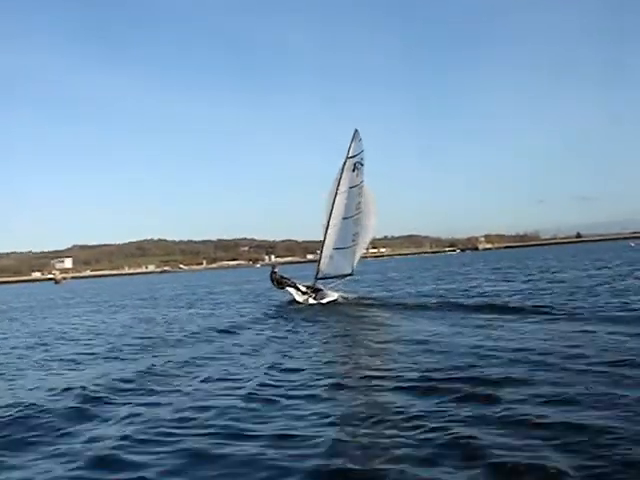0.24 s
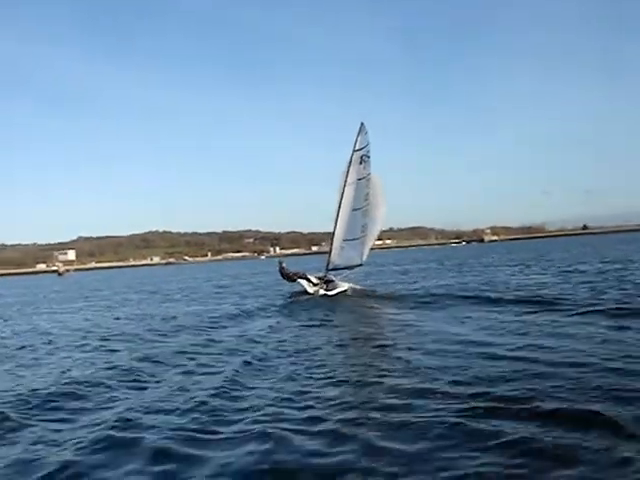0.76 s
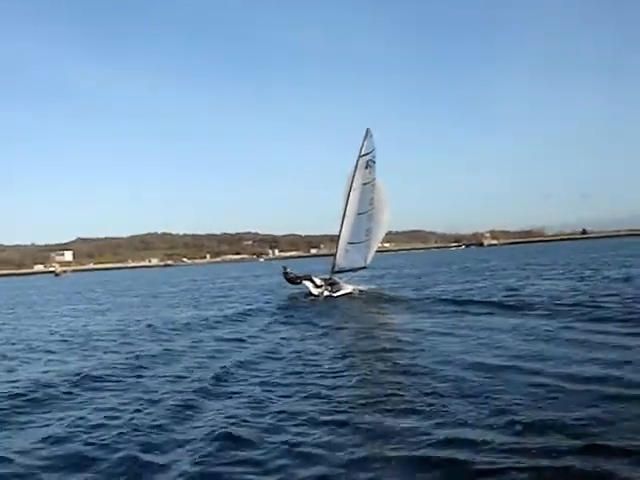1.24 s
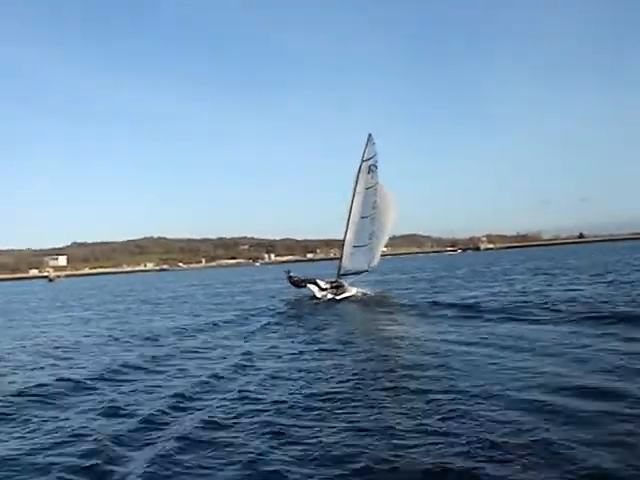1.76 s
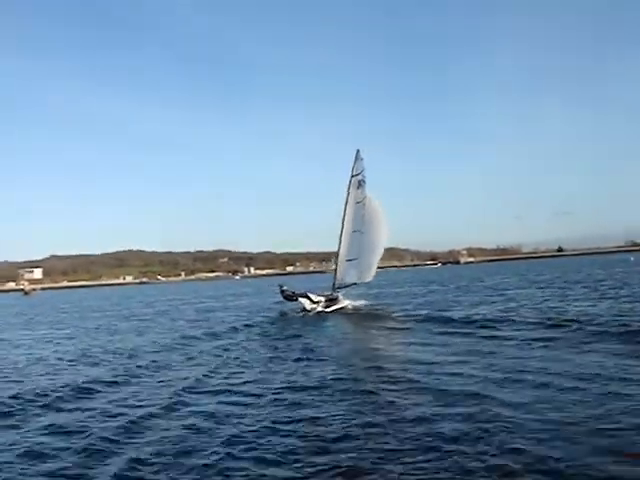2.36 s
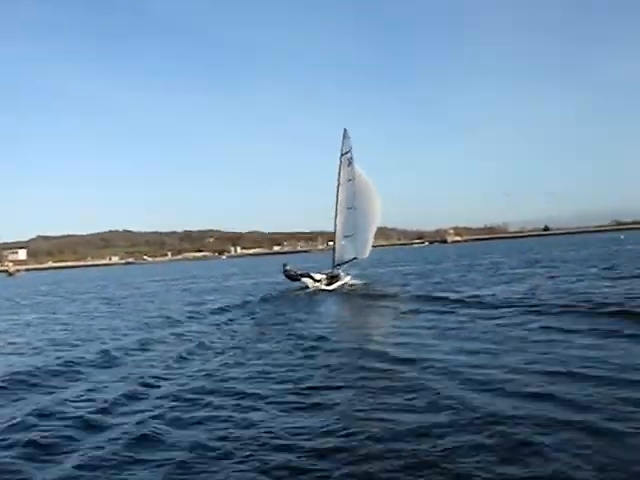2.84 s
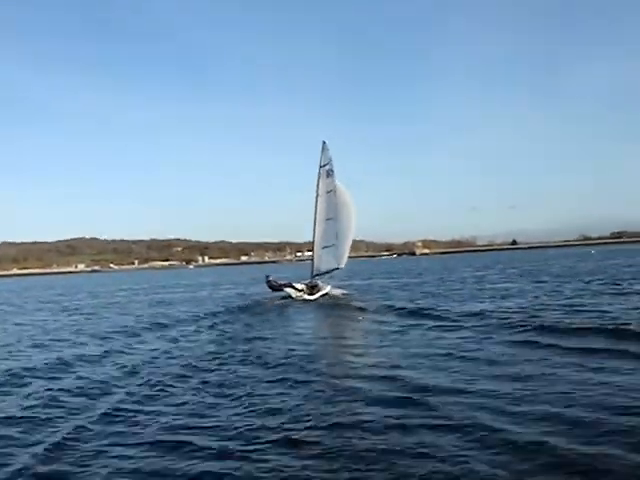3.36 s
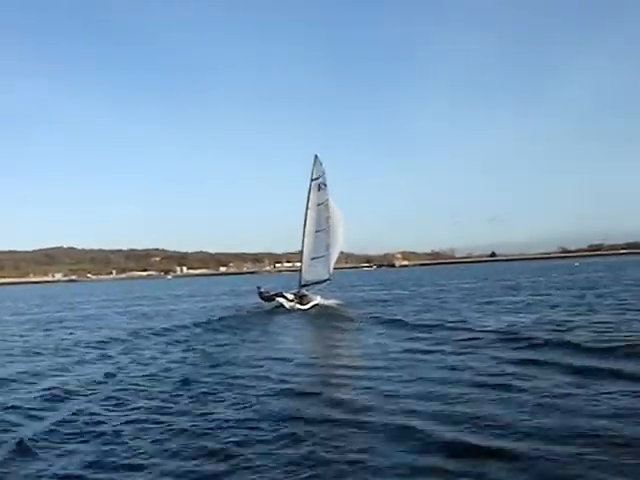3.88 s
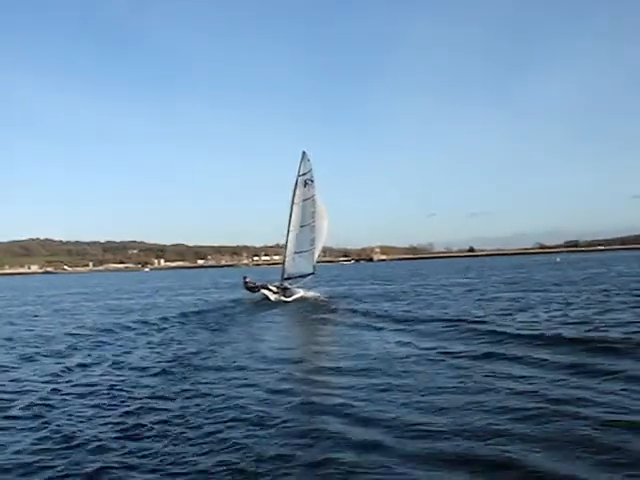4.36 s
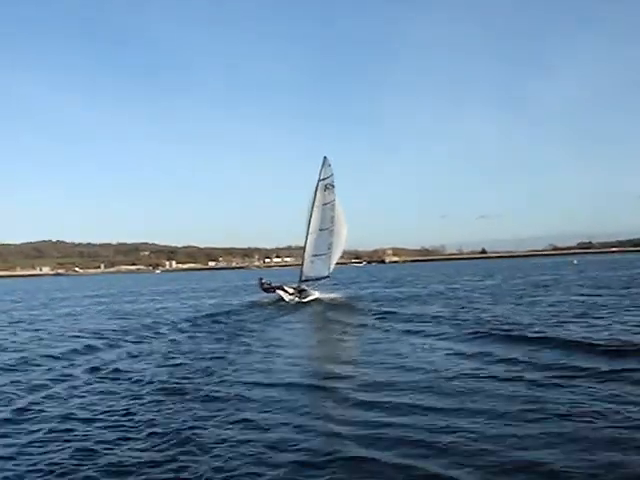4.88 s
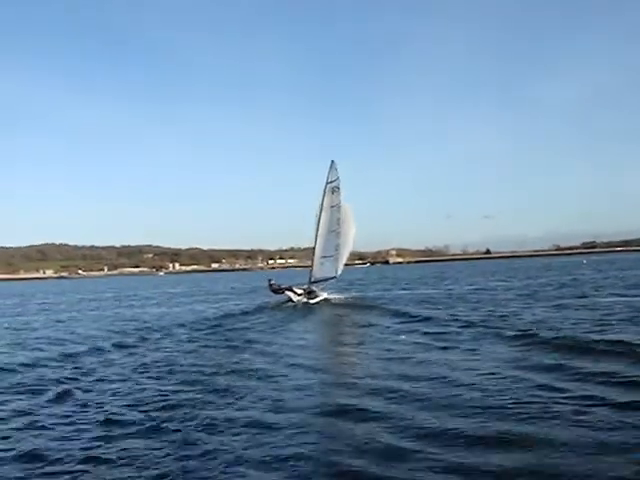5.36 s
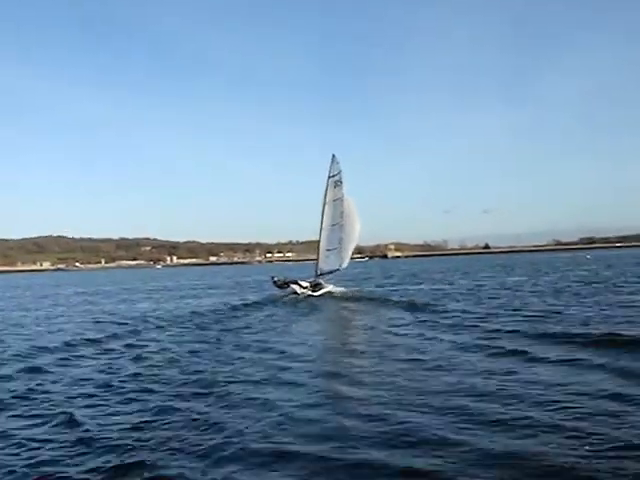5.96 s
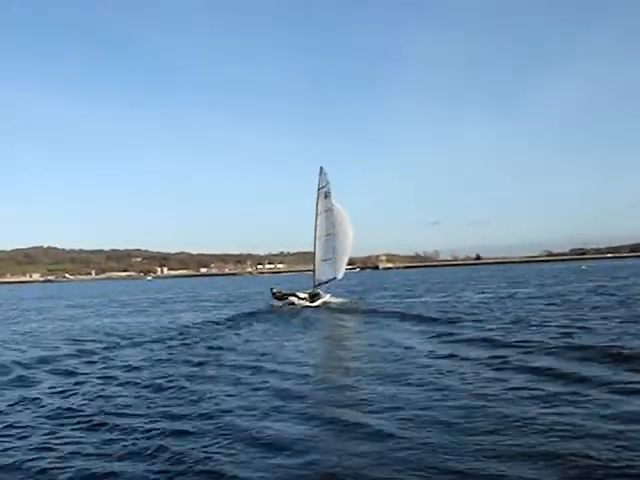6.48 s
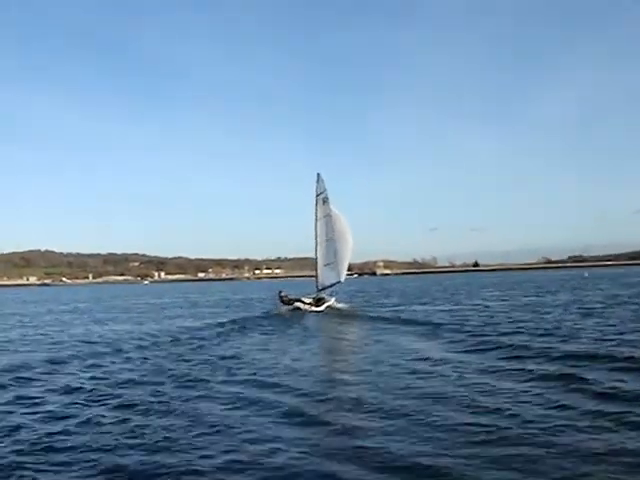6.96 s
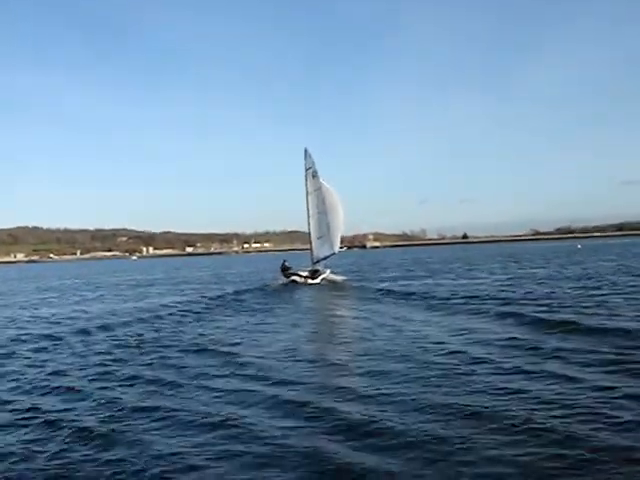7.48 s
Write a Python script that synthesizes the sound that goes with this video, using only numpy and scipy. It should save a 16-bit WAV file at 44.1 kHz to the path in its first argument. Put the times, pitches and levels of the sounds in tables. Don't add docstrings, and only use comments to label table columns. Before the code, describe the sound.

A small boat's outboard motor drones steadily over rushing hull water and hissing spray, while gusty wind buffets and overloads the small microphone.

```python
import sys
import numpy as np
from scipy import signal
from scipy.fft import rfft, irfft, next_fast_len
from scipy.io import wavfile
from scipy.ndimage import uniform_filter1d, minimum_filter1d, map_coordinates

SR = 44100
rng = np.random.default_rng(int(sys.argv[2]) if len(sys.argv) > 2 else 0)


def unload_audio(sound):
    columns = np.transpose(np.atleast_2d(sound))
    steps = np.round(np.clip(columns, -1, 1) * 32767)
    wavfile.write(sys.argv[1], SR, steps.astype(np.int16))


def gain_from_db(level_db):
    decades = np.asarray(level_db, float) / 20
    return 10 ** decades


N = 340452

# time_s, strength_db
WIND_STRENGTH = [(0, 1.5), (.55, -3), (1.0, 0.5), (1.5, 4), (2.1, 1.5), (2.5, 0.5), (3.0, -3.5), (3.5, 0.5),
                 (3.9, 2), (4.53, -4.5), (4.9, 1.5), (5.5, -2.5), (5.85, 1), (6.08, -7), (6.7, -6.5),
                 (7.3, -7.5), (7.72, -3.5)]


def unit(x):
    return x / np.sqrt(np.mean(x ** 2) + 1e-20)


def noise():
    return rng.standard_normal(N)


def curves(rows):
    s, *cols = np.transpose(rows)
    return [np.interp(np.arange(N) / SR, s, c) for c in cols]


def wobble(rate):
    coarse = np.arange(0, N + 32, 32)
    knots = rng.standard_normal(int(N * rate / SR) + 4)
    smooth = map_coordinates(knots, [coarse * rate / SR])
    return np.interp(np.arange(N), coarse, smooth)


def swells(s, db, length_s):
    t = np.arange(0, N / SR + .002, .002)
    distance = (t - s[:, None]) / np.reshape(length_s, (-1, 1))
    humps = np.exp(-4 * distance ** 2)
    return np.interp(np.arange(N) / SR, t, db @ humps)


def coloured(x, spectrum):
    m = next_fast_len(N + 8192)
    f, db = np.transpose(spectrum)
    log_hz = np.log(np.fft.rfftfreq(m, 1 / SR) + 1)
    gain = gain_from_db(np.interp(log_hz, np.log(f), db))
    return unit(irfft(rfft(x, m) * gain, m)[:N])


def patchy(patchy_db):
    z = signal.stft(noise(), nperseg=512)[2]
    field = uniform_filter1d(rng.standard_normal(z.shape), size=8, axis=0)
    field = uniform_filter1d(field, size=10, axis=1)
    return signal.istft(z * gain_from_db(patchy_db * unit(field)), nperseg=512)[1][:N]


def eddy_levels_db():
    # time_s, strength_db, length_s, tightness (-1 slow deep eddies, 1 quick tight ones)
    gust_events = [(.06, 7, .07, -0.47), (.72, 4, 0.13, 0.075), (.87, 5, 0.082, -.3), (1.04, 6, 0.053, .6),
                   (1.17, 5.5, 0.086, .5), (1.31, 3.7, .09, -1.4), (1.45, 3, 0.13, -0.32),
                   (1.57, 2.2, .05, .6), (1.73, 4.6, 0.081, 0.57), (1.97, 5, .14, 0.27),
                   (2.18, 2, 0.065, -.4), (2.48, 4.4, .07, -.9), (3.1, 3.9, .09, 0),
                   (3.3, 4.6, 0.082, -0.48), (3.52, 5.4, .08, -.7), (3.65, 8, 0.053, -.6),
                   (3.81, 7, .1, 0.063), (4.28, 6.8, 0.11, 0), (4.43, 3, .07, -0.44),
                   (4.66, 8.6, 0.088, 0.53), (4.77, 9.1, 0.075, 0.1), (4.95, 3.6, .08, -0.77),
                   (5.12, 4.6, 0.047, -1.1), (5.3, 4.8, .07, 0.62), (5.55, 4, .15, -.8),
                   (5.77, 3.8, 0.1, 0), (6.81, 7.7, 0.093, -0.41), (7.15, 6.8, 0.095, -0.31)]
    s, db, length_s, tight = np.transpose(gust_events)
    strength_db, = curves(WIND_STRENGTH)
    deep_db = .6 * strength_db + swells(s, .8 * db * (1 - tight), length_s)
    middle_db = strength_db + swells(s, db * (1 - tight ** 2 / 2), length_s)
    tight_db = .6 * strength_db + swells(s, 0.77 * db * (1 + tight), length_s)
    return deep_db, middle_db, tight_db


def gust_blows():
    # time_s, peak_db
    blow_events = [
        (1.16, -9),
        (1.567, -2),
        (1.695, -9),
        (1.705, -8),
        (1.7385, -.5),
        (2.008, -11),
        (4.641, -9),
        (4.707, -8),
        (4.756, -9),
    ]
    u = (np.arange(SR // 100) / SR - .003) / .0007
    blow = (u * u - 1) * np.exp(-u * u / 2)
    out = np.zeros(N)
    for s, db in blow_events:
        out[round(s * SR):][:len(u)] += gain_from_db(db) * blow
    return out


def wind():
    # pitch_hz, level_db per Hz
    rumble_colour = [(10, -42), (25, -15.5), (50, -8), (75, -4.5), (110, -8), (250, -55)]
    buffet_colour = [(30, -47), (65, -22.5), (95, -6.5), (160, -0.5), (230, -3), (350, -13), (700, -38),
                     (2000, -89)]
    flutter_colour = [(60, -41), (150, -14.5), (220, -3.5), (300, -1), (450, -6.5), (800, -21), (1600, -35),
                      (4000, -93)]
    rumble_db, buffet_db, flutter_db = -40, -29.5, -29.5
    deep_db, middle_db, tight_db = eddy_levels_db()
    eddies = 2.1 * wobble(40)
    rumble = coloured(noise(), rumble_colour)
    buffet = unit(gain_from_db(eddies + 1.1 * wobble(25)) * coloured(noise(), buffet_colour))
    flutter = unit(gain_from_db(eddies + 1.2 * wobble(30)) * coloured(noise(), flutter_colour))
    out = gain_from_db(rumble_db + deep_db + 1.2 * wobble(9)) * rumble
    out += gain_from_db(buffet_db + middle_db + 0.44 * wobble(16)) * buffet
    out += gain_from_db(flutter_db + tight_db + 0.54 * wobble(14)) * flutter
    return out + gust_blows()


def hull_slosh():
    # time_s, level_db
    slap_events = [(1.46, -0.5), (1.57, 0), (1.71, 4.5), (1.92, 3), (2.19, 4.5), (2.73, 5.5), (3.64, 4),
                   (4.5, 6), (4.77, 6), (5.13, 2), (5.22, 4), (5.32, 4), (5.65, 3), (6.28, 7.5), (6.45, 6),
                   (7.33, 0.5), (7.61, 0.5)]
    # pitch_hz, level_db per Hz
    slosh_colour = [(100, -37), (250, -8.5), (400, -2), (550, 0), (750, -3), (1000, -15), (2000, -51)]
    slap_s, slap_db = np.transpose(slap_events)
    level_db = -27.5 + 0.17 * curves(WIND_STRENGTH)[0] + swells(slap_s, slap_db, .06)
    return gain_from_db(level_db + .8 * wobble(8) + 0.82 * wobble(35)) * coloured(patchy(patchy_db=0.8), slosh_colour)


def wash_and_spray():
    # time_s, level_db
    hull_flow = [(0, -1), (.3, 1.5), (1, .5), (1.5, -1), (2.2, 0.5), (2.8, .5), (3.3, -0.5), (4.1, .5),
                 (4.8, 0), (5.9, .5), (6.3, -1), (7.0, -.5), (7.72, -1.5)]
    # time_s, level_db, length_s
    bow_waves = [(0.256, 1, .07), (1.0, 1.5, .07), (1.2, -2.5, .14), (1.327, 3.5, .12),
                 (1.724, -1.5, 0.081), (1.88, 1.5, 0.11), (2.533, -3, 0.12), (2.734, 0, 0.063),
                 (3.454, -1.5, .2), (3.707, 1, .07), (4.03, 1, .08), (4.322, 1, .08), (5.278, 0.5, 0.11),
                 (5.895, 0.5, 0.18), (6.248, -1, .1), (6.717, -1, .07), (7.547, -1.5, 0.11)]
    # pitch_hz, level_db per Hz
    wash_colour = [(20, -50.5), (60, -32), (150, -14.5), (400, -14.5), (700, -3), (1000, -1.5), (1900, -5),
                   (2300, -11.5), (4000, -21.5), (9000, -46)]
    spray_colour = [(300, -35.5), (1000, -13), (2200, -1), (3500, -5), (5300, -8.5), (7000, -15),
                    (10000, -21.5), (14000, -39)]
    wash_db, spray_db, wash_grows = -24.5, -29, 0.7
    flow_db = curves(hull_flow)[0] + swells(*np.transpose(bow_waves))
    surge = 0.17 * wobble(12) + 0.69 * wobble(70)
    wash_level_db = wash_db + wash_grows * flow_db + 0.27 * wobble(16) + .5 * wobble(40) + .6 * surge
    wash = gain_from_db(wash_level_db) * coloured(patchy(patchy_db=0.9), wash_colour)
    drops = (rng.random(N) < 2500 / SR) * noise()
    fizz = unit(patchy(patchy_db=0.76)) + 0.31 * unit(drops)
    return wash + gain_from_db(spray_db + flow_db + 0.88 * surge) * coloured(fizz, spray_colour)


def engine():
    # time_s, firing_hz
    firing_speed = [(0, 115.8), (.4, 115.5), (1.3, 115.8), (1.6, 116.1), (2.12, 116.2), (2.24, 118.6),
                    (2.45, 119.5), (2.7, 120.6), (3.2, 120.6), (3.5, 120.8), (5.2, 121.1), (6.08, 120.9),
                    (6.3, 122), (6.85, 122.8), (7.72, 123.3)]
    # time_s, level_db
    tone_level = [(0, -22), (.25, -25), (.45, -22.5), (.66, -26.5), (.78, -25), (1.1, -22.5), (1.55, -25.5),
                  (2.0, -25), (2.8, -19.5), (3.05, -23), (3.25, -21), (3.5, -19), (3.75, -23.5),
                  (4.05, -19.5), (4.7, -22.5), (5.4, -21.5), (6.4, -20.5), (7.72, -20.5)]
    # time_s, level_db
    boom_level = [(0, -18), (.5, -20.5), (1.15, -19.5), (1.3, -22), (1.5, -20.5), (2.12, -20), (2.16, -28),
                  (2.45, -28), (2.6, -24.5), (3, -25.5), (3.5, -24), (3.8, -27.5), (4.1, -24.5), (4.5, -26),
                  (4.9, -24.5), (6.05, -25), (6.15, -19.8), (7.72, -19.5)]
    throttle_hz = [115.7, 120.8, 122.6]
    order_levels = {3: (-48, -45, -45), 5: (-47, -48, -49), 7: (-44, -33.5, -34), 8: (-35, -31, -31),
                    9: (-37, -44, -43), 10: (-48, -41, -43), 11: (-45, -37, -37), 13: (-31.5, -50, -48),
                    15: (-45, -47, -43), 16: (-38, -34.5, -33.5), 17: (-47, -45, -45), 18: (-41, -45, -46),
                    19: (-54, -36, -32), 20: (-42, -45, -40), 21: (-45, -42, -42), 23: (-46, -48, -48),
                    25: (-52, -42, -35), 27: (-36.5, -44, -47), 30: (-42, -45, -47), 33: (-47, -43, -43),
                    35: (-47, -43, -49), 41: (-47, -45, -40), 42: (-49, -42, -46), 43: (-49, -49, -43)}
    firing_hz, tone_db, boom_db = curves(firing_speed) + curves(tone_level) + curves(boom_level)
    unsteady_hz = firing_hz * (1 + .0005 * wobble(6))
    cycle = 2 * np.pi * np.cumsum(unsteady_hz) / SR / 4
    lag = np.pi / 4
    turn = np.pi * np.clip((120.3 - firing_hz) / 4, 0, 1)
    out = gain_from_db(tone_db + 0.66 * wobble(14)) * np.cos(4 * cycle - lag)
    out += gain_from_db(boom_db + 0.92 * wobble(14)) * np.cos(12 * cycle - lag + turn)
    for order, levels_db in order_levels.items():
        start = -lag if order % 4 == 0 else rng.uniform(0, 2 * np.pi)
        sway = .02 * order ** .5 * wobble(5)
        level_db = np.interp(firing_hz, throttle_hz, levels_db) + .7 * wobble(4)
        out += gain_from_db(level_db) * np.cos(order * cycle + start + sway)
    return np.sqrt(2) * out


def scene():
    return (wind() + hull_slosh() + wash_and_spray() + engine())[None]


def amplifier(x):
    up = np.maximum(x, 0)
    soft = up / (1 + (up / .43) ** 7) ** (1 / 7)
    return soft + np.clip(x, -.72, 0)


def treble_dropouts(x):
    spectrum, hz = rfft(x), np.fft.rfftfreq(N, 1 / SR)
    width_hz = 460
    for low_hz in np.arange(4750, 10300, width_hz):
        band = irfft(spectrum * ((hz >= low_hz) & (hz < low_hz + width_hz)), N)
        power = uniform_filter1d(band ** 2, size=200)
        threshold = np.interp(low_hz, [4750, 5300, 9800], [.12, .25, .33])
        weak = power < threshold * uniform_filter1d(power, size=8000)
        around_weak = minimum_filter1d(1. - weak, size=160) < 1
        longer_gap = wobble(60) > (2.15 if low_hz < 9500 else 1.1)
        muted = around_weak | longer_gap
        x = x - band * uniform_filter1d(1. * muted, size=60)
    return x


def low_pass(x):
    return signal.sosfilt(signal.butter(12, 10030, fs=SR, output="sos"), x)


def record(dry):
    mix = np.maximum(treble_dropouts(amplifier(dry)), -.705)
    return low_pass(mix)


dry = scene()
out = record(dry)
unload_audio(out)
```